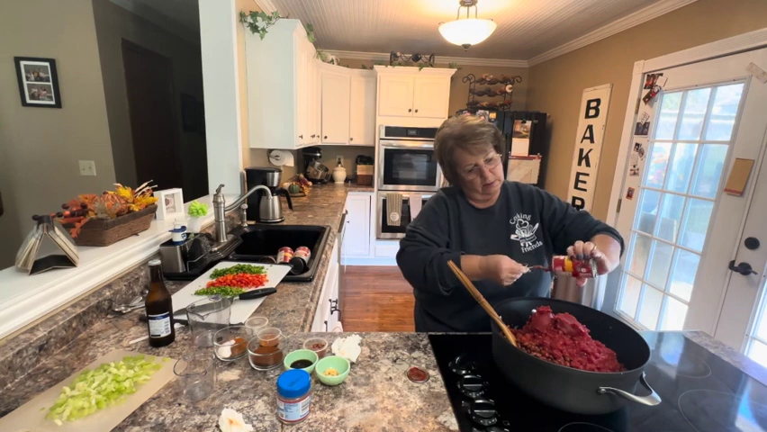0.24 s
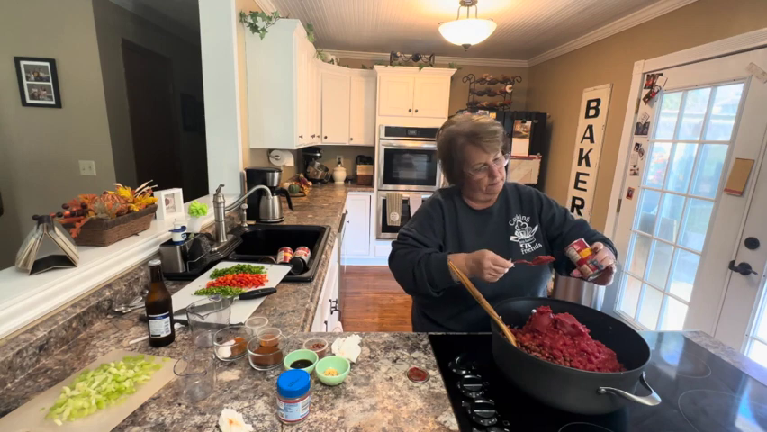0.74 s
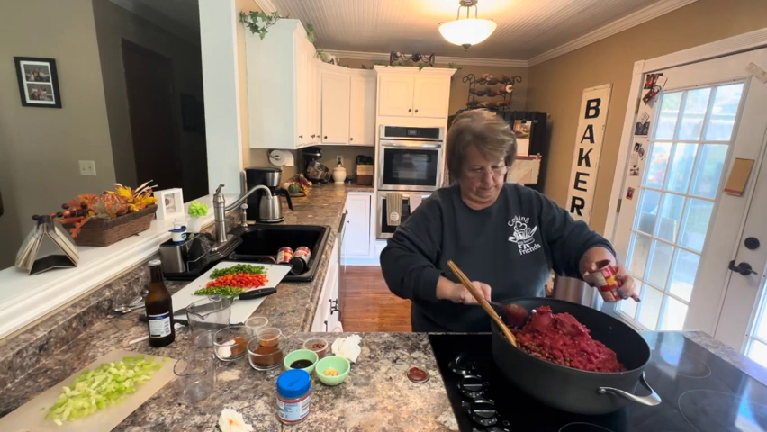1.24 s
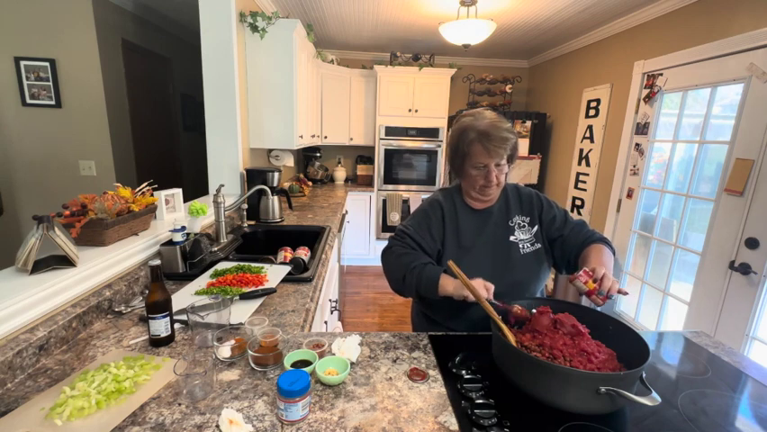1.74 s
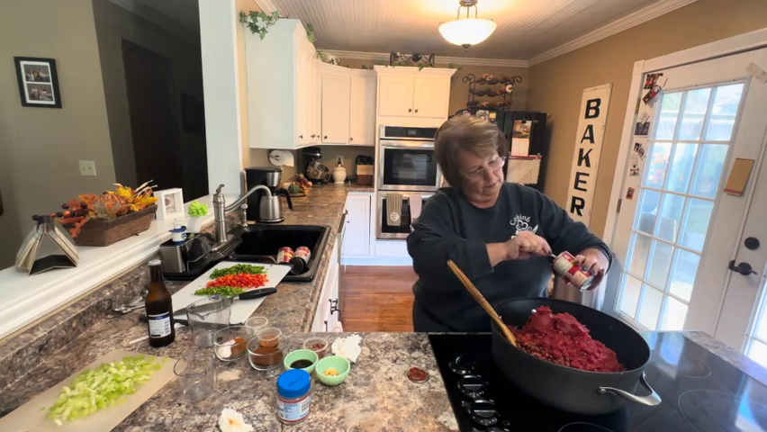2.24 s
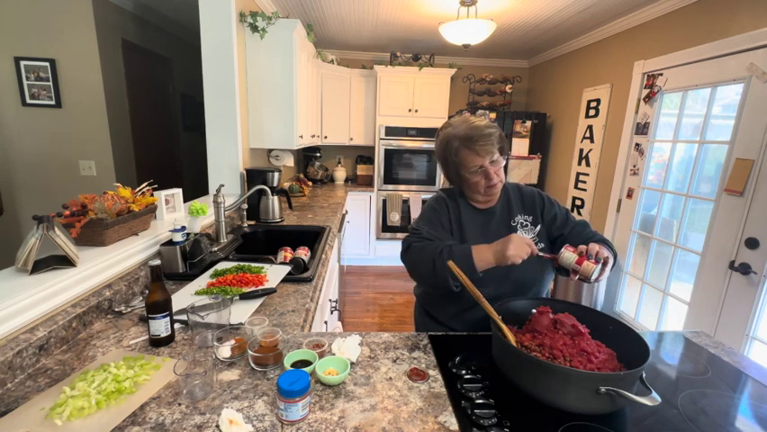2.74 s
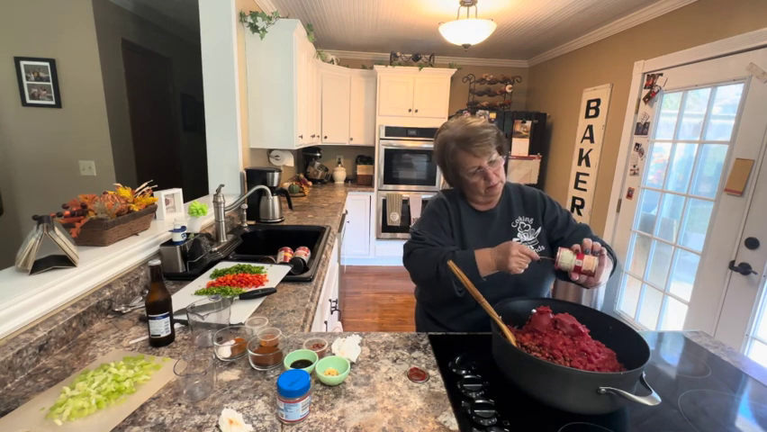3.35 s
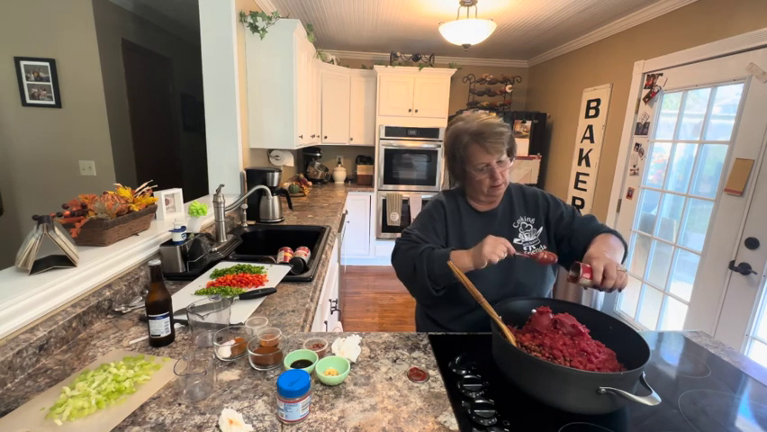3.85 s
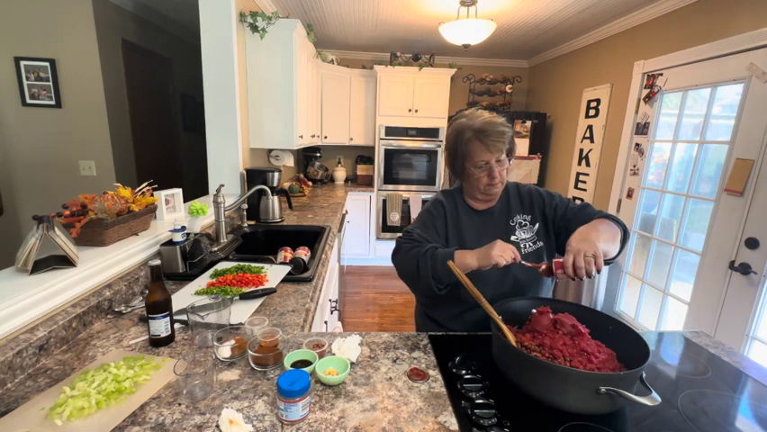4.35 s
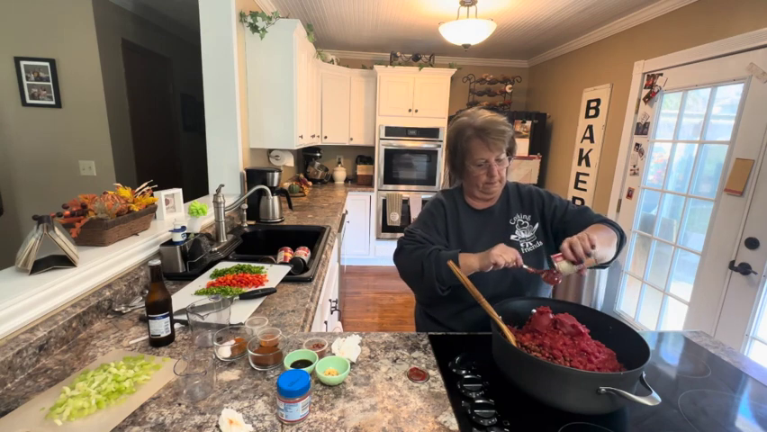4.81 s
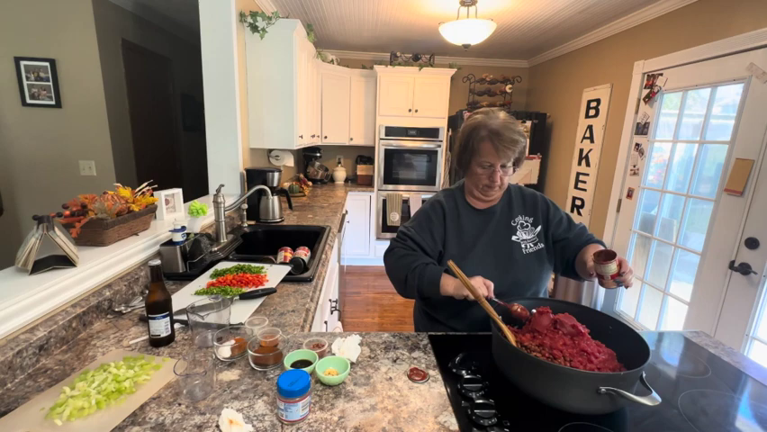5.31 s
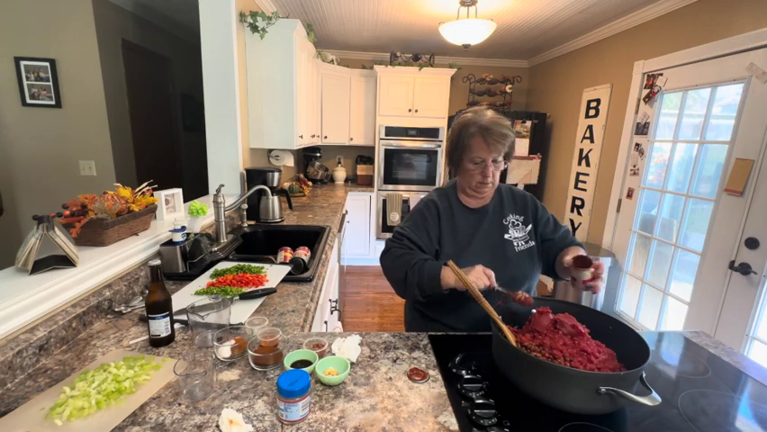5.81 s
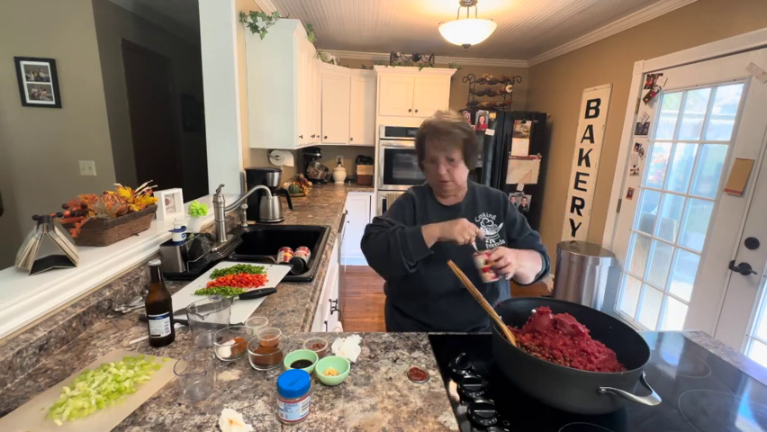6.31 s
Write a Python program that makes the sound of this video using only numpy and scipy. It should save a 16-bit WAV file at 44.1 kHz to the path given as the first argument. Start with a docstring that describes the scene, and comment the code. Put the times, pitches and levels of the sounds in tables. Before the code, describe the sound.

Close-up cooking sounds: quiet spoon scraping in a small tin, then four evenly spaced cracks against a large pan, its metal ringing briefly into the lively room. The spoon returns to the can with pinging clinks, short hollow scrapes and faint wet paste crackle. Two stronger knocks boom through pan and stove, before light scrapes and tighter clinks in the gripped can. A soft low room rush lies underneath.

```python
"""A cook empties a small can of thick paste into a big pan, close by in a hard kitchen that rushes softly.
First the spoon scrapes (stick-slip clicks through resonances), clinks (dying sines) and smacks (noise bursts).
From 1.2 s it is knocked clean on the pan rim four times: noise cracks, ringing modes, thumps from the stove.
More clinks, scrapes and smacks of paste follow; from 5.2 s come two knocks, heavier than the four.
Last, the hand closes round the can and the final clinks ring shorter, among a few last scrapes."""
import sys
import numpy as np
from scipy import signal
from scipy.fft import rfft, irfft
from scipy.io import wavfile
from scipy.ndimage import uniform_filter1d

SR = 44100
rng = np.random.default_rng(int(sys.argv[2]) if len(sys.argv) > 2 else 0)


def waveform_to_disk(signal):
    """Save audio, clipped to [-1, 1], as 16-bit WAV at the path in sys.argv[1]."""
    frames = np.transpose(np.atleast_2d(signal))
    scaled = np.clip(frames, -1, 1) * 32767
    samples = np.round(scaled).astype(np.int16)
    wavfile.write(sys.argv[1], SR, samples)


N = 289727  # samples in the scene
T = np.arange(int(.7 * SR)) / SR  # time axis of a single hit (s)


def amp(db):
    """Decibels to linear gain."""
    return 10 ** (np.asarray(db) / 20)


def evened(x):
    """Scales a sound to rms 1 over its whole length."""
    return x / np.sqrt(np.mean(x ** 2) + 1e-20)


def unit_hit(x, size=882):
    """Scales a hit to rms 1 over its first 20 ms."""
    return x / np.sqrt(np.mean(x[:size] ** 2) + 1e-20)


def read(points, hz):
    """Reads a curve at the given frequencies, on a log axis."""
    f, value = np.transpose(points)
    return np.interp(np.log(hz + 1), np.log(f + 1), value)


def add(mix, s, sound):
    """Lays a sound into the mix at s seconds."""
    part = mix[max(round(s * SR), 0):][:len(sound)]
    part += sound[:len(part)]


def colour(x, points, size=4096):
    """Filters with the given spectrum, minimum phase so that nothing sounds before the hit."""
    log_gain = np.log(amp(read(points, abs(np.fft.fftfreq(size, 1 / SR)))))
    spectrum = np.exp(np.conj(signal.hilbert(log_gain)))
    taps = np.fft.ifft(spectrum).real[:size // 2]
    return signal.oaconvolve(x, taps)[:len(x)]


def burst(t60):
    """Noise that dies by 60 dB in t60 seconds."""
    return rng.standard_normal(len(T)) * 1e-3 ** (T / t60)


def ring(modes, pitch=1, scatter_db=0, loose=1):
    """Dying sines on a steady or moving pitch; where the blow lands changes the share of each."""
    hz, db, t60 = np.transpose(modes)[:, :, None]
    size = amp(db + scatter_db * rng.standard_normal(db.shape))
    turns = hz * np.cumsum(pitch * np.ones(len(T))) / SR + rng.random(db.shape)
    decay = 1e-3 ** (T / (t60 * loose))
    return (size * np.sin(2 * np.pi * turns) * decay).sum(0)


def slips(per_s, spread_db):
    """A random train of tiny clicks of either sign, a few of them large."""
    size = amp(spread_db * np.minimum(rng.exponential(1, N), 4))
    happens = rng.random(N) < per_s / SR
    return size * rng.choice([-1, 1], N) * happens


def resonate(x, hz, width_hz):
    """A resonance that follows the curve hz: shift down to zero, smooth, shift back up."""
    turn = np.exp(2j * np.pi * np.cumsum(hz) / SR)
    r = np.exp(-np.pi * width_hz / SR)
    smooth = signal.lfilter([1 - r], [1, -r], x / turn + 1e-18)
    return 2 * (turn * smooth).real


def arch(u, peak, sharpness):
    """Rises from 0 to 1 at the share peak of a stroke and falls back to 0."""
    return np.sin(np.pi / 2 * np.interp(u, [0, peak, 1], [0, 1, 0])) ** sharpness


# spectrum of the steady room noise: [f/Hz, relative level/dB]
ROOM_NOISE = [(15, -68), (25, -51), (44, -15.5), (105, -5), (141, -11.5), (373, -9.5), (659, -16),
              (911, -21), (1330, -27.5), (1440, -28.5), (3720, -29.5), (6740, -36), (9320, -50),
              (11300, -41), (16000, -61)]
RUSH_DB, DRONE_DB = -60, -76.5  # rms levels


def room_noise():
    """The soft rush of kitchen appliances is shaped noise; noise through a 101 Hz ring is a narrow low drone."""
    gain = amp(read(ROOM_NOISE, np.fft.rfftfreq(N, 1 / SR)))
    rush = irfft(rfft(rng.standard_normal(N)) * gain, N)
    drone = signal.oaconvolve(rng.standard_normal(N), ring([(101, 0, .25)]))[:N]
    return amp(RUSH_DB) * evened(rush) + amp(DRONE_DB) * evened(drone)


# how long the kitchen rings: [f/Hz, t60/s]
ROOM_T60 = [(80, .55), (400, 0.27), (1000, 0.47), (3000, 0.45), (5500, 0.49), (8000, 0.42), (15000, .28)]
# colour of the reverberation: [f/Hz, relative level/dB]
ROOM_COLOUR = [(80, -11.5), (400, 3.5), (1000, 2), (3000, -5), (6000, -3), (14000, -4.5)]
# echoes from counter, ceiling and wall: [t/s, gain]
ECHOES = [(.0034, 0.21), (0.0228, -0.14), (0.033, 0.042)]


def kitchen(x, wet_db, build_s, size=512):
    """Near surfaces echo over a diffuse tail that builds up and dies at its own pace in each band."""
    hz, t, z = signal.stft(rng.standard_normal(len(T)), SR, nperseg=size)
    decay = 1e-3 ** (t / read(ROOM_T60, hz)[:, None])
    z = z * decay * (1 - np.exp(-t / build_s))
    z /= np.linalg.norm(z, axis=1, keepdims=True)  # equal energy in every band before colouring
    tail = signal.istft(z, SR, nperseg=size)[1][:len(T)]
    response = amp(wet_db) * colour(tail / np.linalg.norm(tail), ROOM_COLOUR)
    response[0] += 1  # the direct sound
    for s, gain in ECHOES:
        add(response, s, np.array([gain]))
    return signal.oaconvolve(x, response)[:N]


# paste pulling off the spoon: [t/s, level/dB]
SMACKS = [(0.7054, -71.5), (0.984, -67.5), (3.143, -71), (4.3435, -63.5)]
# spectrum of a smack: [f/Hz, relative level/dB]
SMACK_COLOUR = [(500, -9.5), (2500, 3), (7000, 4), (9000, -5), (12000, 0), (16000, -8.5)]


def paste_smacks():
    """Sticky paste lets go of the spoon with a small bright snap, a short burst of coloured noise."""
    out = np.zeros(N)
    for s, db in SMACKS:
        add(out, s, amp(db) * unit_hit(colour(burst(t60=.03), SMACK_COLOUR)))
    return out


# scraping strokes: [start t/s, length/s, drag on the can bottom level/dB, rasp on the wall level/dB,
# wet paste crackle level/dB, hollow note in mid-stroke f/Hz]
STROKES = [(0.0, 0.051, -64.5, -64, -72, 930), (0.103, 0.3, -63.5, -61, -72.5, 880),
           (0.874, 0.16, -78, -85, -74, 890), (2.627, 0.099, -47, -53, -64, 918),
           (2.701, 0.095, -48, -52, -60, 835), (2.89, 0.057, -52, -59.5, -62, 851),
           (3.274, 0.056, -65, -57, -63.5, 997), (3.342, 0.35, -66.5, -65.5, -77, 916),
           (4.65, 0.1, -50, -57.5, -56.5, 923), (6.183, 0.099, -64, -60, -62.5, 910),
           (6.355, 0.05, -42, -61, -61, 980)]
# spectrum of the rasp: [f/Hz, relative level/dB]
RASP_COLOUR = [(800, -32.5), (1500, -3.5), (2150, -3.5), (2600, 0.5), (3500, 0), (4400, -5), (8000, -14),
               (16000, -32)]
# spectrum of the paste crackle: [f/Hz, relative level/dB]
PASTE_COLOUR = [(2000, -27.5), (6000, 1), (8000, -1), (10000, -3), (13000, -0.5), (16000, -2.5)]
# modes of the whole can, shared with the clinks: [f/Hz, relative level/dB, t60/s before any grip factor]
TIN = [(3240, -3.5, 0.047), (3570, -1.5, 0.036), (3994, 3.5, 0.05), (4780, -7.5, 0.082), (4810, 0.5, .06),
       (7400, -11.5, 0.057), (8300, -29, 0.079)]
# modes of the patch of wall under the spoon, shared too: [multiple of its pitch, relative level/dB, t60/s]
PATCH = [(.9, -5.5, 0.061), (1, 3.5, 0.038), (1.07, -2, 0.041)]
STROKE_SAG = 0.062  # share by which the hollow note falls along a stroke


def scraping(tin_db=-1, unsteady_db=3, grit_db=-3):
    """The spoon sticks and slips along the tin, stirring its hollow and wall, while the paste crackles."""
    drag, rasp, wet, hollow_hz = np.zeros((4, N))
    for start, length, drag_db, rasp_db, paste_db, hz in STROKES:
        u = np.clip((np.arange(N) / SR - start) / length, 0, 1)  # progress through the stroke
        drag += amp(drag_db) * arch(u, peak=0.23, sharpness=0.52)
        rasp += amp(rasp_db) * arch(u, peak=0.58, sharpness=0.8)
        wet += amp(paste_db) * arch(u, peak=0.69, sharpness=1)
        hollow_hz = np.where(u > 0, hz * (1 + STROKE_SAG * (.5 - u)), hollow_hz)
    wander = evened(uniform_filter1d(rng.standard_normal(N), size=400))
    pressure = amp(unsteady_db * wander)
    friction = evened(pressure * slips(per_s=3300, spread_db=4.0))
    hollow = resonate(friction, hollow_hz, width_hz=162)
    bottom = evened(resonate(hollow, hollow_hz, width_hz=260))
    # the edge catches on the wall
    gritty = friction + amp(grit_db) * evened(slips(per_s=43, spread_db=3.0))
    tin = ring(TIN[:2], scatter_db=2.5) + ring(PATCH, pitch=2632) * amp(-3)
    ringing = evened(signal.oaconvolve(gritty, tin)[:N])
    wall = evened(colour(gritty, RASP_COLOUR)) + amp(tin_db) * ringing
    paste = evened(colour(slips(per_s=2500, spread_db=3.0), PASTE_COLOUR))
    return drag * bottom + rasp * wall + wet * paste


# spoon against the can: [t/s, hollow note level/dB, wall ping level/dB, tin ring level/dB, tick level/dB,
# settled hollow note f/Hz, ping f/Hz]
CLINKS = [(0.271, -58, -54, -71, -80, 1000, 2480), (0.3277, -93, -56.5, -66, -60.5, 845, 2480),
          (2.0646, -44, -53.5, -66, -48, 857, 2780), (2.2651, -29.5, -43.5, -40, -44, 902, 2750),
          (2.3936, -59.5, -42, -67.5, -44, 1040, 2733), (2.6914, -53, -57, -61, -83, 987, 2080),
          (2.919, -54.5, -54.5, -59, -52.5, 848, 2580), (3.2872, -58.5, -61, -62, -72, 1024, 2020),
          (3.35, -64, -59, -66, -65, 840, 3090), (3.4045, -57, -75, -65, -64, 910, 2580),
          (3.5408, -72, -59.5, -66, -80, 810, 2790), (3.6413, -68.5, -61, -62, -60, 850, 2800),
          (4.0821, -53.5, -55.5, -53, -46, 815, 2520), (4.6237, -34, -48.5, -51, -44, 906, 2710),
          (4.8526, -68, -53, -73.5, -55.5, 982, 2065), (6.3328, -37.5, -55.5, -53.5, -49, 868, 2950),
          (6.3643, -55.5, -59, -54, -50, 990, 2870), (6.4633, -44, -57, -57.5, -47, 874, 2690),
          (6.5371, -40.5, -54, -59, -51, 983, 3030), (6.5421, -54, -47, -58, -48, 956, 2790)]
# air and bottom of the can: [multiple of the hollow note, relative level/dB, t60/s before the grip factor]
HOLLOW = [(1, 5.5, 0.035), (1.18, 2, 0.026), (1.42, -8, 0.02)]
# spectrum of the tick: [f/Hz, relative level/dB]
TICK_COLOUR = [(100, -7.5), (500, 1.5), (800, 0), (1500, 0), (3000, 1.5), (6000, 0.5), (9000, -7),
               (12500, -6), (16000, -14)]
# factors on the clinks' hollow and tin ring times before and after the hand closes round the can at GRASP_S
LOOSE, FIRM, GRASP_S = 1.2, 0.72, 6.1


def can_clinks(stretch=0.1, settle_s=0.0037):
    """The spoon meets the can: a tick, a short ring of the wall, and a hollow note that a firm grip damps."""
    out = np.zeros(N)
    glide = 1 + stretch * np.exp(-T / settle_s)  # the dented tin is stiffer until it springs back
    for s, hollow_db, ping_db, tin_db, tick_db, hollow_hz, ping_hz in CLINKS:
        loose = LOOSE if s < GRASP_S else FIRM
        hollow = ring(HOLLOW, hollow_hz * glide, loose=loose) * (1 - np.exp(-T / .001))
        add(out, s, amp(hollow_db) * unit_hit(hollow))
        add(out, s, amp(ping_db) * unit_hit(ring(PATCH, ping_hz)))
        add(out, s, amp(tin_db) * unit_hit(ring(TIN, scatter_db=1.5, loose=loose)))
        add(out, s, amp(tick_db) * unit_hit(colour(burst(t60=0.045), TICK_COLOUR)))
    return out


# dull thud of the pan on its support: [f/Hz, relative level/dB]
THUD_COLOUR = [(30, -29.5), (65, 0.5), (110, -9.5), (165, -0.5), (250, 0.5), (400, -7), (530, -4),
               (680, -22.5), (1000, -28), (2000, -62)]


def stove_thud(lag_cycles=1.7):
    """A push that spreads as a bending wave: low tones travel slower, so the thud sweeps down."""
    hz = np.fft.rfftfreq(len(T), 1 / SR)
    lag = np.exp(-2j * np.pi * lag_cycles * np.log(hz + 1))
    return irfft(amp(read(THUD_COLOUR, hz)) * lag, len(T)) * (T < .2)


# spoon on the pan rim, shared by body and knocks: [t/s, force level/dB, bright crack level/dB,
# ring of the spoon level/dB, lap of the wave round the rim t/s]
KNOCKS = [(1.2312, -2, -23.5, -44, 0.0074), (1.3885, -1.5, -24.5, -37.5, 0.0083),
          (1.5408, 0, -24.5, -39.5, 0.0069), (1.696, -.5, -24.5, -50, .008), (5.1625, 1, -21.5, -46, .0105),
          (5.5658, 2.5, -23.5, -45, 0.0092)]
# modes of the pan: [f/Hz, relative level/dB before chance scatter, t60/s]
PAN = [(1175, -11, 0.3), (1528, -14.5, 0.53), (2053, -7.5, 0.55), (2210, -10.5, 0.18), (2420, -6.5, 0.2),
       (2574, -1, 0.47), (2604, -0.5, 0.21), (2510, -3, 0.17), (2660, -7, 0.33), (2800, -8, .22),
       (3042, -7.5, .22), (3366, 3, 0.46), (3430, -4, 0.38), (3700, -4, .28), (3730, 0, 0.36),
       (3836, 2.5, 0.35), (3880, -3.5, 0.27), (4332, -10, .36), (4463, -8, 0.31), (4570, -12.5, 0.27),
       (5300, -8, 0.22), (5180, -5.5, 0.21), (5200, -6.5, 0.21), (5706, -11.5, .32)]
# modes of the stove under the pan: [f/Hz, relative level/dB, t60/s]
STOVE = [(66, -6.5, 0.53), (97.4, 5.5, .3)]
PAN_DB, THUD_DB, BOOM_DB = -31.5, -33, -43.5  # levels at a force of 0 dB
BOOM_GROWTH = 2.2  # heavy blows favour the boom (dB per dB of force)


def pan_body(rock_s=0.008):
    """After each blow the pan's modes ring on, and the stove under it thuds and, a moment later, booms."""
    out = np.zeros(N)
    thud = unit_hit(stove_thud())
    for s, force_db, *_ in KNOCKS:
        add(out, s, amp(PAN_DB + force_db) * unit_hit(ring(PAN, scatter_db=1.5)))
        add(out, s, amp(THUD_DB + force_db) * thud)
        boom = ring(STOVE) * (1 - np.exp(-T / 0.006))
        add(out, s + rock_s, amp(BOOM_DB + BOOM_GROWTH * force_db) * unit_hit(boom))
    return out


# spectrum of the crack of the contact: [f/Hz, relative level/dB]
CRACK_COLOUR = [(200, -33), (750, -23), (1150, -26), (1400, -19), (2200, -22.5), (3500, 1), (5200, 7),
                (6200, -3), (7000, -14), (8500, -14.5), (10000, -26), (12000, -16), (15000, -22.5),
                (16000, -35)]
# spectrum of the crowd of short-lived wall modes after it: [f/Hz, relative level/dB]
WALL_COLOUR = [(150, -28.5), (550, -21.5), (750, -32.5), (1350, -26), (2100, -13), (2650, 0), (3150, -3.5),
               (3750, 2), (4250, -12), (5250, -2), (6900, -22.5), (16000, -43.5)]
# spectrum of the lower wall modes, stirred most by heavy blows: [f/Hz, relative level/dB]
CLANK_COLOUR = [(600, -34), (780, -7), (900, -8.5), (1170, -3), (1330, -13), (1550, -0.5), (1750, -13),
                (2050, 4.5), (2350, 5.5), (2700, -14.5), (4000, -40)]
# modes of the spoon: [f/Hz, relative level/dB, t60/s]
SPOON = [(6700, 0, 0.097), (7200, -1, 0.074), (7530, 1, 0.061), (7900, -8, 0.11), (8340, -6.5, 0.048),
         (11500, -11.5, 0.12)]
WALL_DB, CLANK_DB, LAP_DB = -23, -32, -22  # levels at a force of 0 dB
CLANK_GROWTH = 1.6  # heavy blows favour the low modes (dB per dB of force)


def pan_knocks():
    """Each blow of the spoon cracks and sets the wall of the pan clattering, as short coloured bursts."""
    out = np.zeros(N)
    for s, force_db, crack_db, spoon_db, lap_s in KNOCKS:
        clank_db = CLANK_DB + CLANK_GROWTH * force_db
        add(out, s, amp(crack_db) * unit_hit(colour(burst(t60=0.036), CRACK_COLOUR)))
        add(out, s, amp(WALL_DB + force_db) * unit_hit(colour(burst(t60=0.057), WALL_COLOUR)))
        add(out, s, amp(clank_db) * unit_hit(colour(burst(t60=0.028), CLANK_COLOUR)))
        add(out, s, amp(spoon_db) * unit_hit(ring(SPOON)))
        # the bending wave runs round the rim and gathers again a moment later
        lap = ring([(2650, -2.0, 0.018), (2903, -5.5, 0.047)]) * (1 - np.exp(-T / 0.00043))
        add(out, s + lap_s, amp(LAP_DB + force_db) * unit_hit(lap))
    return out


def scene():
    """Can, pan body and knocks sound into the same kitchen, each with its own share of reverberation."""
    can = kitchen(can_clinks() + scraping() + paste_smacks(), wet_db=-3.0, build_s=0.0093)
    body = kitchen(pan_body(), wet_db=-1.5, build_s=0.0096)
    knocks = kitchen(pan_knocks(), wet_db=0.5, build_s=0.0023)
    return (room_noise() + can + body + knocks)[None]


def record(dry):
    """The sound is kept between 44 Hz and about 16 kHz."""
    lean = signal.sosfilt(signal.butter(5, 44, "highpass", fs=SR, output="sos"), dry)
    lowpass = signal.firwin(151, 15950, window=("kaiser", 9), fs=SR)
    return signal.oaconvolve(lean, lowpass[None], "same")


dry = scene()
out = record(dry)
waveform_to_disk(out)
```